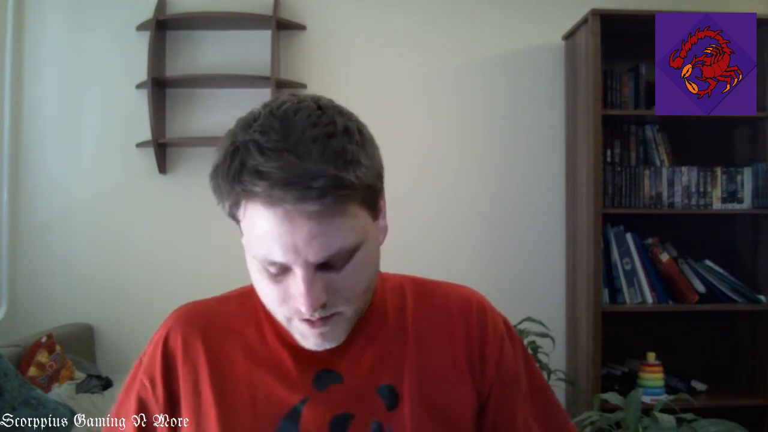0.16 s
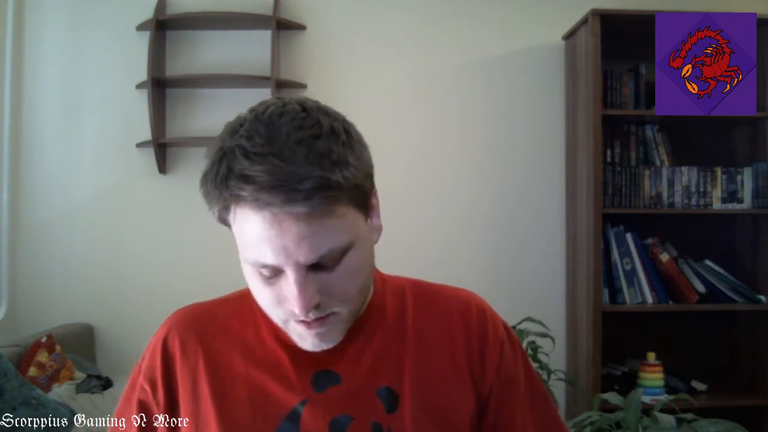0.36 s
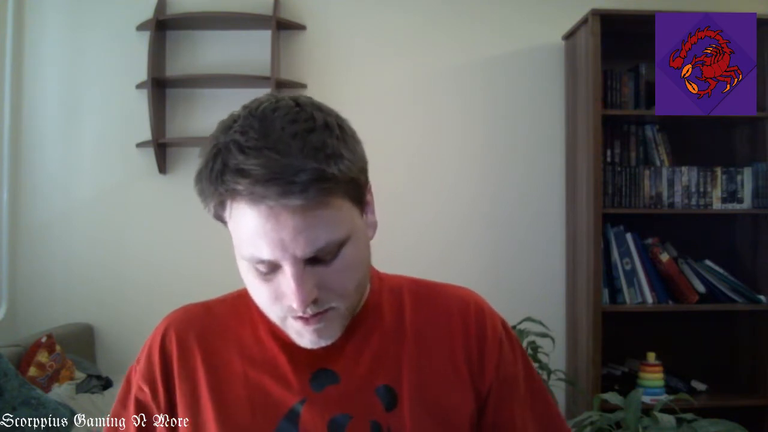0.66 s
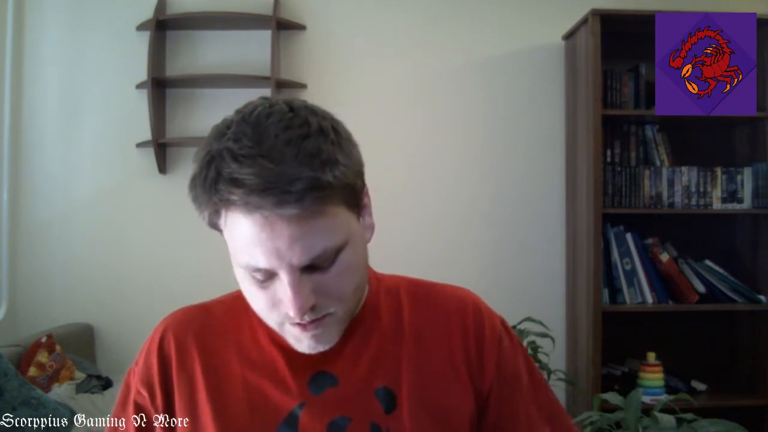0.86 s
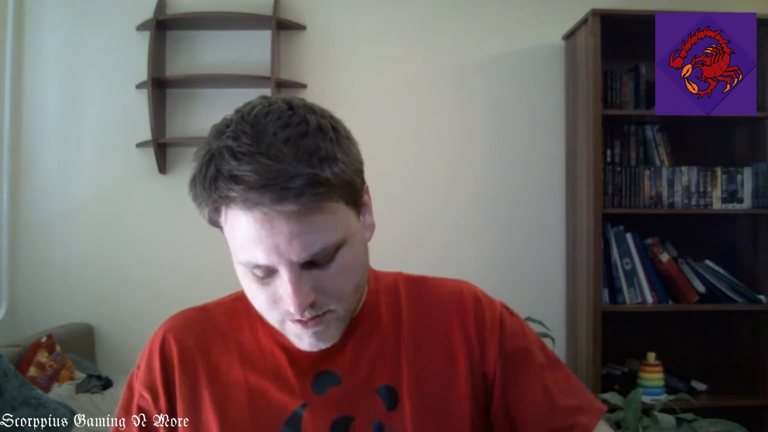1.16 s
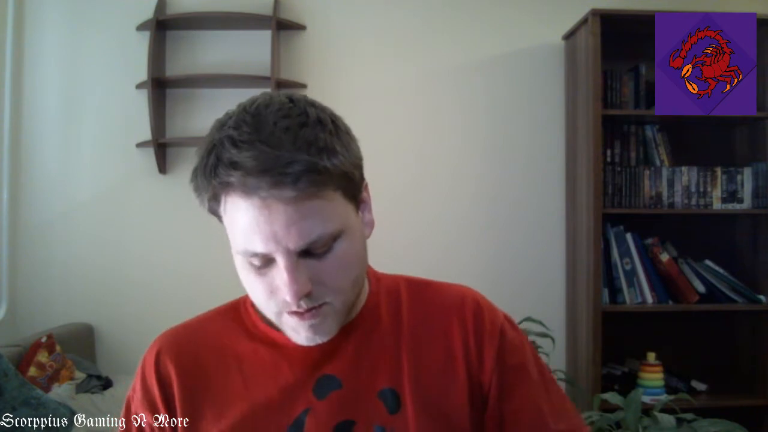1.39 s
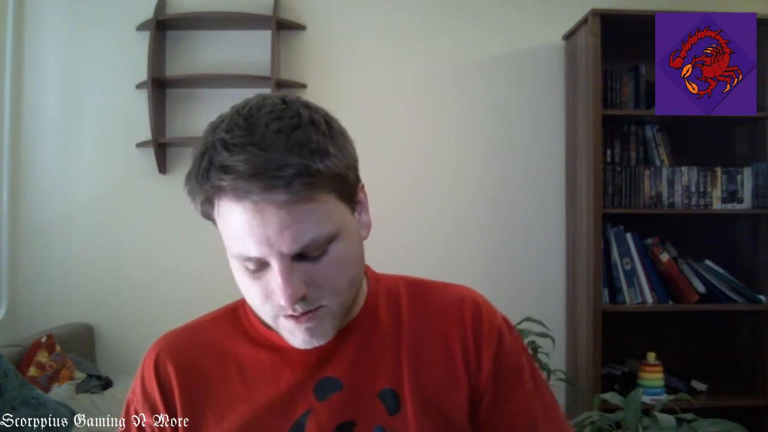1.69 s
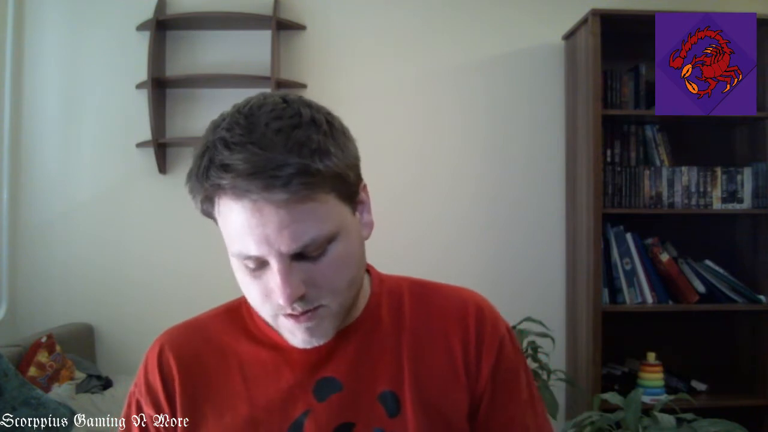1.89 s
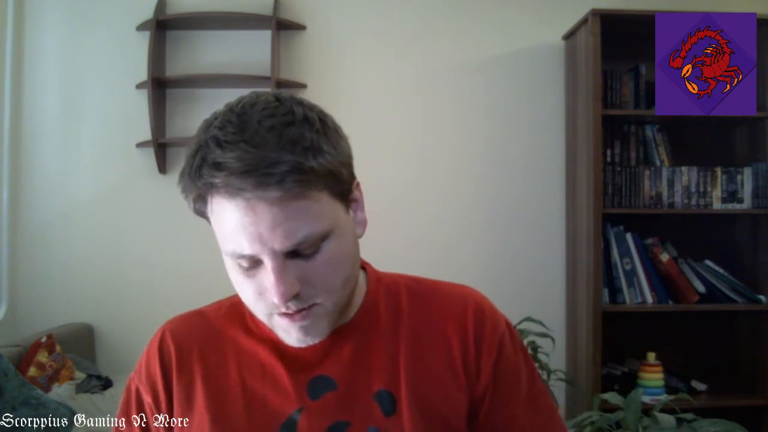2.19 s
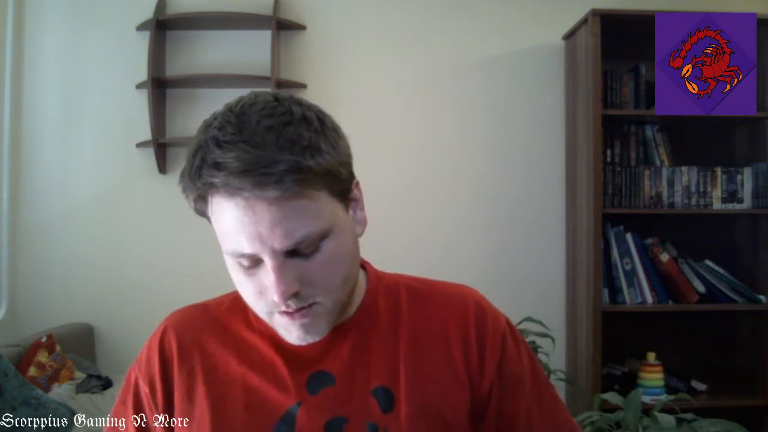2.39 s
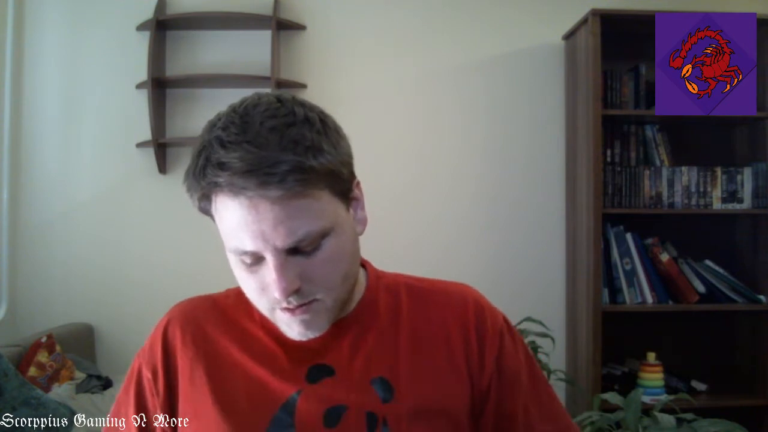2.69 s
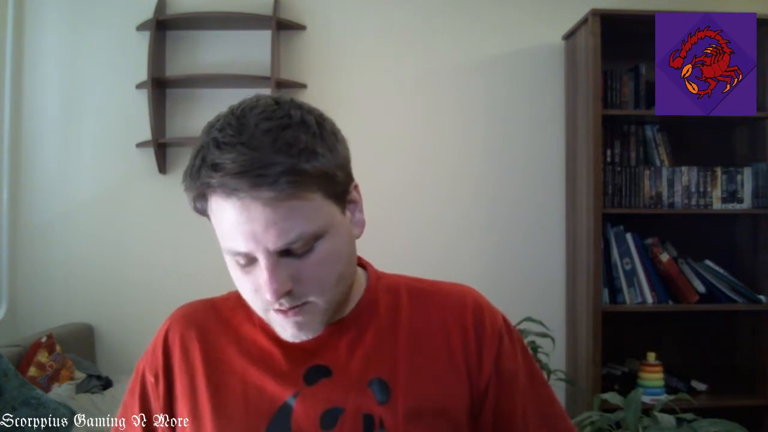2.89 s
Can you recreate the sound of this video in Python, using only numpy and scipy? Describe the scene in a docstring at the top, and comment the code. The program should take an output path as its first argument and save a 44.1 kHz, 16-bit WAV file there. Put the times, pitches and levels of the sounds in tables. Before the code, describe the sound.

A thin plastic bag is handled close by, crinkling lightly with scattered snaps from the start. From about 1.1 to 1.5 seconds it crackles densely as it is pulled. After a brief lull near 1.9 seconds, the sharpest snaps and small hollow pops come between 2.1 and 2.6 seconds, then thin to soft crinkling by 3 seconds. A deep hum and faint hiss continue underneath in the small room.

```python
"""A thin plastic bag, handled and pulled open close by in a small room.
Creases buckle in sharp snaps, each ringing at the pitch of its facet; the wall flips and the hollow pops.
Between snaps the film crinkles in a swarm of tiny clicks and the whole bag rustles low.
A deep hum and a faint hiss lie underneath."""
import sys
import numpy as np
from scipy import signal
from scipy.io import wavfile
from scipy.ndimage import uniform_filter1d

SR = 44100
rng = np.random.default_rng(int(sys.argv[2]) if len(sys.argv) > 2 else 0)


def to_wav(sig):
    """Store sig (one row per channel, or 1-D mono) as 16-bit WAV at the path in sys.argv[1].

    Samples outside -1..1 are clipped; the rate is SR.
    """
    pcm = np.clip(np.atleast_2d(sig), -1, 1) * 32767
    pcm = np.round(pcm).astype(np.int16)
    wavfile.write(sys.argv[1], SR, pcm.T)  # frames by channels


N = 134505
TIME_S = np.arange(N) / SR

# snapping creases, before trim: (time [s], ring [dB], ring pitch [Hz], crack [dB], flex [dB])
SNAPS = [(0.0274, -24, 5900, -44, -35), (0.2006, -24.5, 4460, -39, -28), (0.3677, -30, 3440, -34, -32.5),
         (0.3776, -26.5, 5600, -24, -47), (0.4694, -22, 5360, -45, -31.5), (0.5275, -19, 5830, -32, -39),
         (0.6823, -19.5, 5000, -42, -38), (0.6889, -34, 8700, -40, -23), (0.772, -27, 2550, -38, -43),
         (0.8458, -13, 2480, -31, -22.5), (0.8545, -21, 2440, -19, -24), (0.9772, -29, 10600, -29, -37),
         (1.018, -16.5, 3780, -24, -40), (1.1493, -29, 6000, -23, -47), (1.16, -14, 3850, -16, -27),
         (1.1704, -19, 4770, -21, -45), (1.189, -16.5, 5100, -21, -35), (1.1989, -15.5, 6500, -20, -47),
         (1.1911, -22, 2680, -34, -44), (1.2088, -23, 5900, -29, -44), (1.227, -30, 4500, -23, -47),
         (1.2506, -22, 10000, -32, -52), (1.27, -21, 5570, -20, -42), (1.285, -20, 4700, -29, -32),
         (1.2894, -21.5, 3270, -34, -33), (1.2963, -15, 6040, -14, -28.5), (1.3032, -16.5, 5200, -16, -35),
         (1.3095, -19, 2540, -25, -30), (1.317, -21.5, 3340, -30, -29), (1.3272, -16, 3400, -15, -21.5),
         (1.3624, -13.5, 6500, -11, -36), (1.3668, -17, 2930, -12.5, -27), (1.3818, -19, 9000, -30, -39),
         (1.4105, -15.5, 6700, -23, -32), (1.4201, -18, 4400, -21, -24), (1.4339, -18.5, 6900, -16.5, -51),
         (1.457, -17.5, 4160, -14, -28.5), (1.4784, -16.5, 3750, -31, -30.5), (1.5234, -17, 7650, -28, -46),
         (1.5384, -20.5, 4400, -26, -24.5), (1.8189, -20.5, 6500, -16.5, -45),
         (1.8312, -32, 6400, -21, -61), (1.8691, -31.5, 4650, -35, -52), (1.9651, -26.5, 3870, -37, -33.5),
         (2.0904, -24, 7440, -29, -31), (2.1186, -23, 11900, -18, -44), (2.1407, -27, 10200, -17, -31),
         (2.1558, -11.5, 6400, -7, -15), (2.173, -19, 8700, -34, -21.5), (2.1822, -15, 5940, -18, -34),
         (2.249, -22, 8600, -24, -42), (2.3078, -17.5, 6060, -10, -22.5), (2.3361, -18, 4200, -15, -37),
         (2.34, -21, 5900, -30, -24), (2.3626, -23, 3800, -15, -24), (2.37, -33, 10200, -3.5, -27),
         (2.3719, -10.5, 6300, -21, -22.5), (2.3908, -18, 6900, -8, -28), (2.4991, -24.5, 10300, -22, -37),
         (2.5914, -26, 3480, -35, -39), (2.595, -16, 4270, -10.5, -22.5), (2.6145, -25, 7200, -21, -46),
         (2.63, -27, 5600, -32, -48), (2.6471, -21.5, 6240, -20, -36), (2.7157, -39, 9700, -25.5, -52),
         (2.758, -28.5, 4000, -33, -44), (2.798, -26, 7100, -19, -53), (2.9369, -27.5, 4900, -31, -42),
         (2.983, -25.5, 3600, -34, -35)]
# wall flips: (time [s], pitch [Hz], level [dB])
POPS = [(0.688, 377, -33), (0.74, 536, -31), (0.846, 1124, -24), (1.32, 695, -27), (1.367, 644, -24.5),
        (1.412, 684, -28), (1.538, 660, -27), (1.714, 395, -35), (2.107, 422, -26.5), (2.143, 410, -33),
        (2.154, 203, -25.5), (2.156, 536, -23), (2.173, 550, -24), (2.306, 375, -25.5), (2.369, 356, -22.5),
        (2.391, 517, -27)]
# crinkle as the hands work, before trim: (time [s], treble [dB], middle [dB], rustle [dB])
HANDLING = [(0.0, -33.5, -43.5, -47), (0.081, -41, -47, -58.5), (0.215, -31, -39.5, -43),
            (0.43, -40.5, -51, -54), (0.461, -28.5, -36, -42.5), (0.663, -35.5, -44, -56.5),
            (0.69, -28, -38.5, -34.5), (0.725, -33.5, -39, -39), (0.757, -27.5, -38.5, -44),
            (0.8, -32, -40.5, -51), (0.88, -30, -35.5, -43.5), (1.05, -32.5, -44.5, -47.5),
            (1.13, -37.5, -42.5, -49.5), (1.17, -27, -45, -41.5), (1.199, -27, -37.5, -54),
            (1.232, -38.5, -45, -70), (1.291, -29, -36.5, -44.5), (1.421, -31.5, -32.5, -45),
            (1.439, -38.5, -40.5, -51), (1.469, -27.5, -35.5, -37.5), (1.52, -32, -46, -52),
            (1.528, -29.5, -38.5, -42), (1.58, -31.5, -42.5, -49), (1.67, -40, -51, -42.5),
            (1.731, -34, -46.5, -40), (1.77, -34.5, -43, -54), (1.85, -49, -71, -68),
            (1.93, -41.5, -53.5, -64), (1.961, -33.5, -42, -44.5), (2.001, -30, -34, -45),
            (2.041, -38, -47, -51), (2.105, -30, -37.5, -33.5), (2.159, -25, -35.5, -34),
            (2.2, -36, -43, -41), (2.28, -38, -48.5, -59), (2.361, -27.5, -34, -43), (2.4, -26, -42, -36),
            (2.481, -42.5, -50, -59), (2.541, -31.5, -48, -52), (2.572, -45.5, -51, -55),
            (2.599, -30, -39, -46), (2.68, -38.5, -48.5, -53), (2.781, -43.5, -51.5, -58),
            (2.793, -34.5, -46.5, -51.5), (2.92, -43.5, -57, -56), (2.99, -39.5, -44, -74),
            (3.04, -37.5, -47.5, -50)]
# film, top register: (frequency [Hz], relative density [dB])
TREBLE_SPECTRUM = [(2100, -38), (2800, -3.5), (3800, -1), (5500, 1), (8000, -3), (10200, -1.5),
                   (11500, -7.5), (15000, -5)]
# film, middle register: (frequency [Hz], relative density [dB])
MIDDLE_SPECTRUM = [(550, -2), (750, 4), (1100, 0), (1900, -0.5), (2450, 2.5), (3300, -4.5)]
# whole bag, low register: (frequency [Hz], relative density [dB])
RUSTLE_SPECTRUM = [(110, -0.5), (200, -0.5), (280, -4.5), (400, 5), (540, 4.5), (640, -9)]
# echoes off desk and body: (delay [s], gain [dB])
ECHOES = [(.0013, -26.5), (.0037, -21), (.0062, -25)]
# hum tones: (frequency [Hz], rms level [dB])
HUM_TONES = [(30.8, -38), (80.3, -55)]
# room noise: (frequency [Hz], relative density [dB])
NOISE_SPECTRUM = [(25, 2.5), (45, -6.5), (60, 1.5), (80, -1), (110, -22.5), (200, -12), (500, -22.5),
                  (1500, -30), (5000, -38), (15000, -48)]

RING_TRIM_DB, CRACK_TRIM_DB, FLEX_TRIM_DB = 1, -4.5, -0.5
SNAP_RMS_WINDOW_S, CUTOFF_HZ = 0.001, 16000
RING_DECAY_S, CRACK_DECAY_S, FLEX_DECAY_S = 0.00072, 0.00058, 0.0012   # at SNAP_REF_DB
SNAP_REF_DB, STRETCH_DB_PER_DB = -22, 0.28   # stronger snaps shiver longer
POP_RISE_S, POP_DECAY_S = 0.00034, 0.0053
TREBLE_TRIM_DB, MIDDLE_TRIM_DB, RUSTLE_TRIM_DB = -3.5, -4, -3.5
CLICKS_PER_S, RATE_DB_PER_DB = 1800, 0.4   # rate at mean treble level; slope against that level
CLICK_SPREAD_DB, CLICK_COLOUR_DB = 5.0, 5.5
CLUSTER_DB, CLUSTERS_PER_S = 2.08, 150


def snaps(size=512, kick=2.87, ring_band_ratio=1.184):
    """Each crease jolts, then shivers: its facet rings, the edge cracks, the sheet around it flexes."""
    out, t = np.zeros(N + SR), np.arange(size) / SR
    decays_s = np.array([[RING_DECAY_S], [CRACK_DECAY_S], [FLEX_DECAY_S]])
    for time_s, ring_db, ring_hz, crack_db, flex_db in SNAPS:
        stretch = from_db(STRETCH_DB_PER_DB * (max(ring_db, crack_db) - SNAP_REF_DB))
        shiver = rng.standard_normal((3, size)) * np.exp(-t / stretch / decays_s)
        shiver[:, 0] = kick * np.sign(shiver[0, 0])   # first jolt
        ring = butter(shiver[0], [ring_hz / ring_band_ratio, ring_hz * ring_band_ratio], "band", order=1)
        ring = butter(ring, 0.32 * ring_hz, "high")
        crack = butter(shiver[1], [8000, CUTOFF_HZ], "band")
        flex = butter(shiver[2], [430, 1780], "band")
        snap = (from_db(ring_db + RING_TRIM_DB) * unit_rms(ring)
                + from_db(crack_db + CRACK_TRIM_DB) * unit_rms(crack)
                + from_db(flex_db + FLEX_TRIM_DB) * unit_rms(flex))
        start = int(time_s * SR)
        out[start:start + size] += snap * np.sqrt(SNAP_RMS_WINDOW_S * SR / size)
    return out[:N]


def pops():
    """The wall flips and the hollow rings briefly, at a pitch set by how the bag is held."""
    out = np.zeros(N)
    for time_s, pitch_hz, level_db in POPS:
        t = np.maximum(TIME_S - time_s, 0)
        envelope = (1 - np.exp(-t / POP_RISE_S)) * np.exp(-t / POP_DECAY_S)
        out += from_db(level_db) * envelope * np.sin(2 * np.pi * pitch_hz * t)
    return out


def crinkle():
    """Tiny creases give way in clusters, faster under a firmer grip, while film slides on film."""
    times_s, *levels_db = np.transpose(HANDLING)
    treble_db, middle_db, rustle_db = [np.interp(TIME_S, times_s, db) for db in levels_db]
    rate_per_s = CLICKS_PER_S * from_db(RATE_DB_PER_DB * (treble_db - treble_db.mean()))
    onsets = rng.random(N) < rate_per_s / SR
    size_db = CLICK_SPREAD_DB * np.minimum(rng.exponential(1, N), 3.57)
    clicks = unit_rms(onsets * from_db(size_db))

    def register(spectrum, bands, slide_db):
        """Clicks plus sliding noise; random gain and sign per band give each click its own colour."""
        def drive():
            colour = from_db(CLICK_COLOUR_DB * rng.uniform(-1.13, 1, N)) * rng.choice([-1, 1], N)
            return unit_rms(clicks * colour) + from_db(slide_db) * rng.standard_normal(N)
        return levelled(filter_bank(spectrum, drive, bands))

    treble = from_db(treble_db + TREBLE_TRIM_DB) * register(TREBLE_SPECTRUM, bands=11, slide_db=-7.5)
    middle = from_db(middle_db + MIDDLE_TRIM_DB) * register(MIDDLE_SPECTRUM, bands=5, slide_db=-7.5)
    rustle = from_db(rustle_db + RUSTLE_TRIM_DB) * register(RUSTLE_SPECTRUM, bands=6, slide_db=-7)
    clusters = from_db(CLUSTER_DB * drift(CLUSTERS_PER_S))
    return (treble + middle) * clusters + rustle


def room(x, tail_db=-19, t60_s=0.13, lowpass_hz=5600):
    """Close echoes off desk and body, then a short, dull tail."""
    t = TIME_S[:SR // 2]
    tail = butter(rng.standard_normal(len(t)), lowpass_hz, "low", order=1) * from_db(-60 * t / t60_s)
    response = from_db(tail_db) * tail / np.sqrt(np.sum(tail ** 2))
    for delay_s, gain_db in ECHOES:
        response[int(delay_s * SR)] += from_db(gain_db)
    return signal.fftconvolve(x, response)[:N]


def hum(waver_db=1.5, wavers_per_s=3.43):
    """Two deep tones, each wavering in level."""
    out = np.zeros(N)
    for hz, level_db in HUM_TONES:
        amplitude = np.sqrt(2) * from_db(level_db - waver_db * drift(wavers_per_s))
        out += amplitude * np.sin(2 * np.pi * (hz * TIME_S + rng.random()))
    return out


def room_noise(level_db=-49):
    """Steady low rumble with a faint hiss."""
    return from_db(level_db) * filter_bank(NOISE_SPECTRUM, lambda: rng.standard_normal(N), bands=18)


def from_db(db):
    """Decibels to gain."""
    return 10 ** (np.asarray(db) / 20)


def unit_rms(x):
    """Scale to rms 1."""
    return x / np.sqrt(np.mean(x ** 2) + 1e-20)


def butter(x, hz, kind, order=2):
    """Causal Butterworth filter."""
    sos = signal.butter(order, np.clip(hz, 10, .47 * SR), kind, fs=SR, output="sos")
    return signal.sosfilt(sos, x + 1e-18)


def drift(knots_per_s):
    """Random wander, rms 1."""
    knots = rng.standard_normal(size=1000)
    return unit_rms(np.interp(TIME_S * knots_per_s, np.arange(len(knots)), knots))


def filter_bank(spectrum, drive, bands):
    """Log-spaced bands weighted by the spectrum, each fed by a fresh drive(); rms 1."""
    hz, db = np.transpose(spectrum)
    edges_hz = np.geomspace(hz[0], hz[-1] * 1.08, bands + 1)
    out = np.zeros(N)
    for low_hz, high_hz in zip(edges_hz, edges_hz[1:]):
        gain = from_db(np.interp(np.log(low_hz * high_hz) / 2, np.log(hz), db))
        out += gain * butter(drive(), [low_hz, high_hz], "band")
    return unit_rms(out)


def levelled(x, size=1100):
    """Even out slow swings; keep the grain."""
    power = uniform_filter1d(uniform_filter1d(x ** 2, size), size)
    return x / np.sqrt(power + 1e-12)


def scene():
    """The bag in its room, mono."""
    bag = snaps() + pops() + crinkle()
    return (bag + room(bag) + hum() + room_noise())[None]


def record(dry):
    """Overload clips the highest peaks; a steep low-pass cuts the top."""
    lowpass = signal.cheby2(20, 70, CUTOFF_HZ + 400, fs=SR, output="sos")
    return signal.sosfilt(lowpass, np.clip(dry, -.8, .8))


dry = scene()
out = record(dry)
to_wav(out)
```